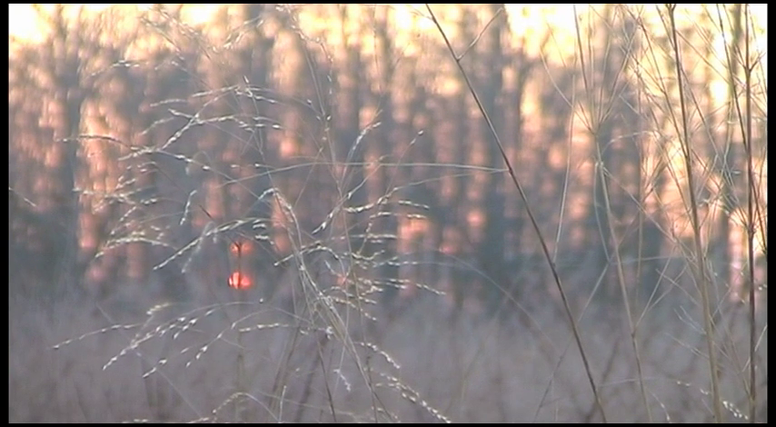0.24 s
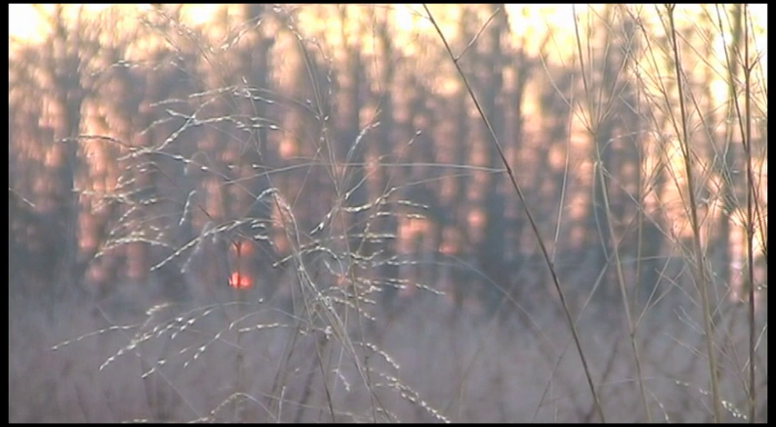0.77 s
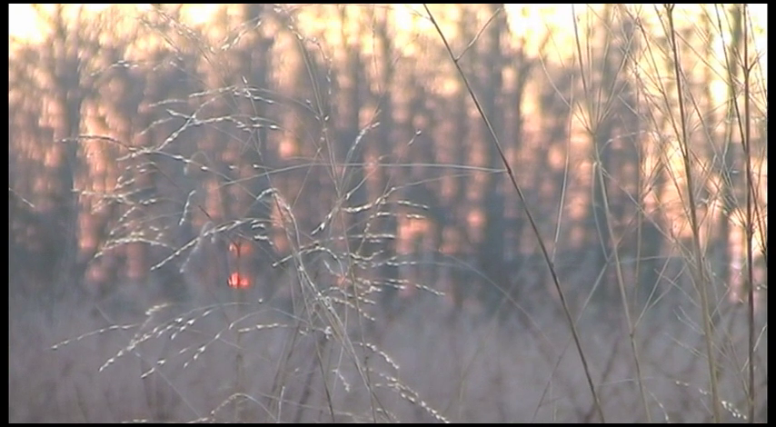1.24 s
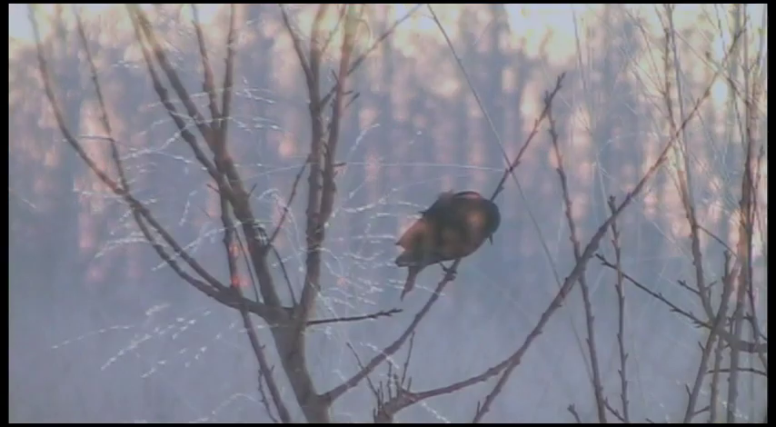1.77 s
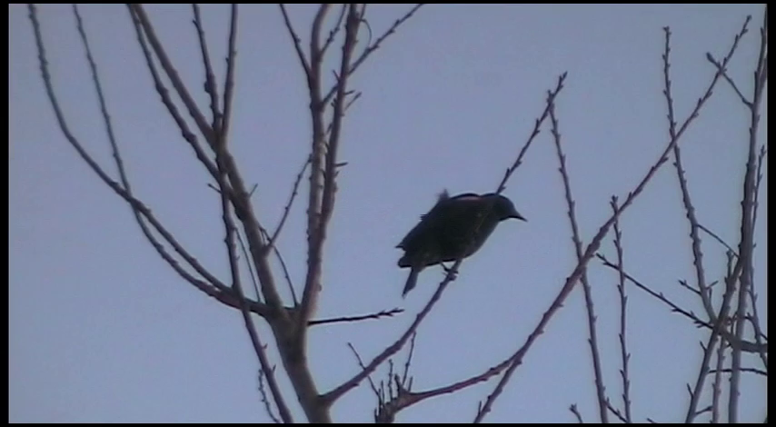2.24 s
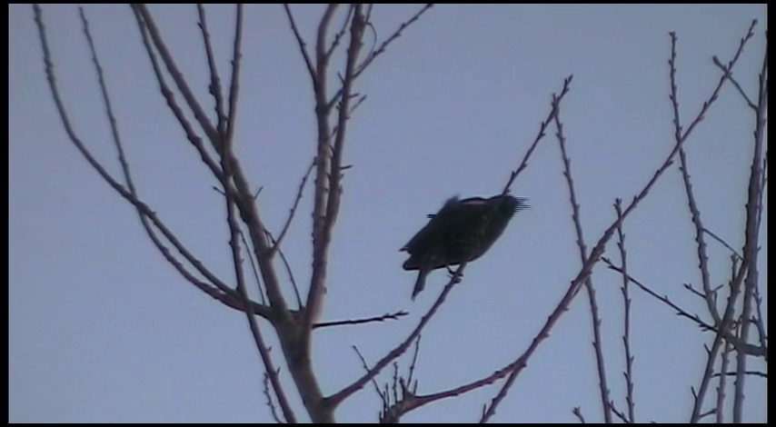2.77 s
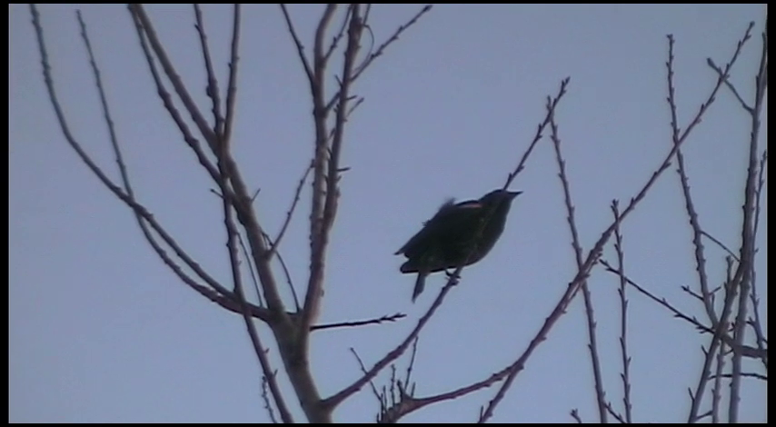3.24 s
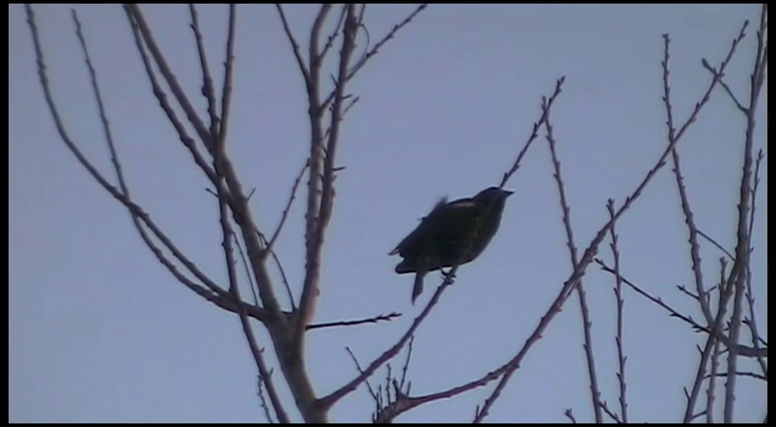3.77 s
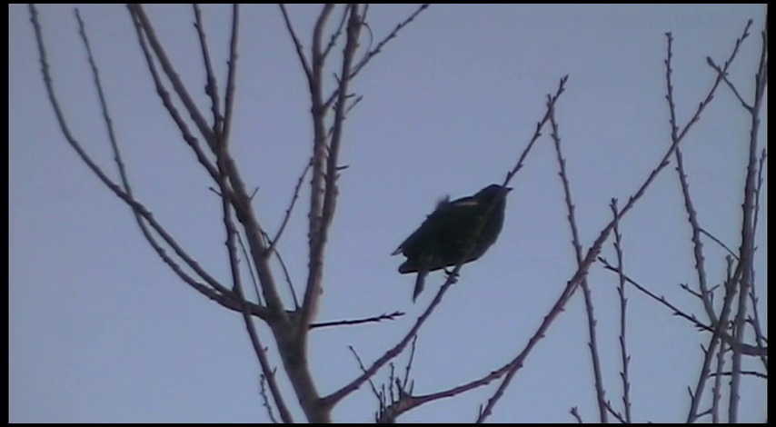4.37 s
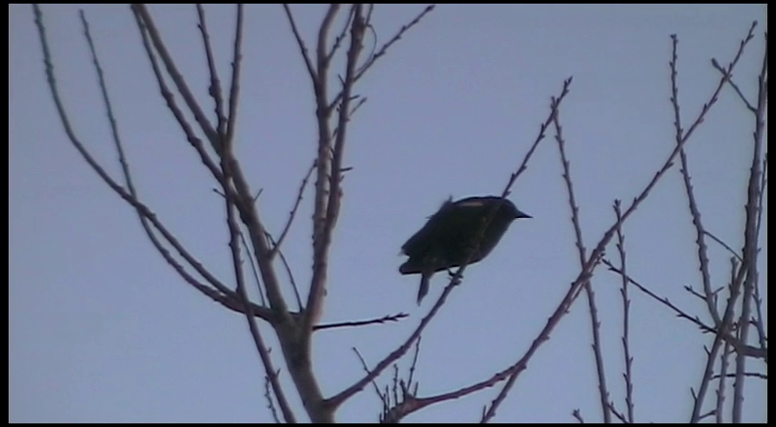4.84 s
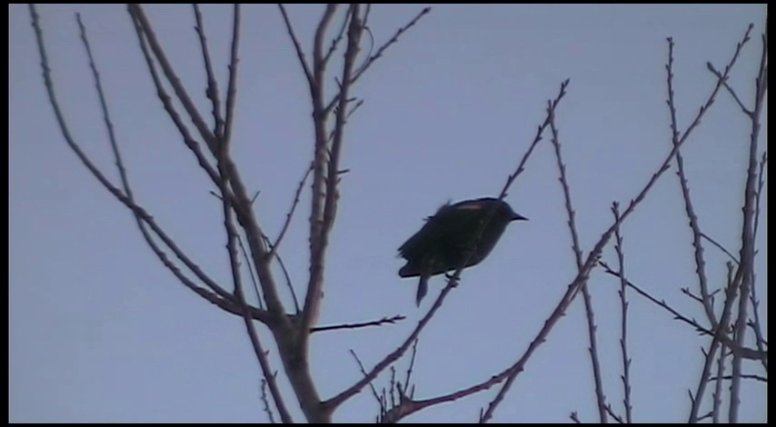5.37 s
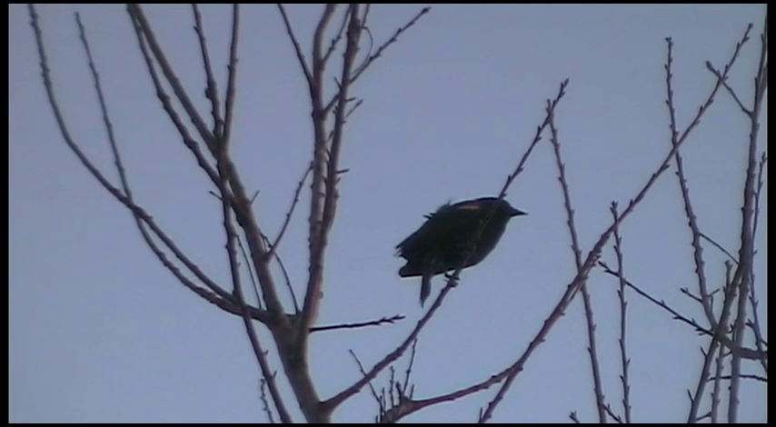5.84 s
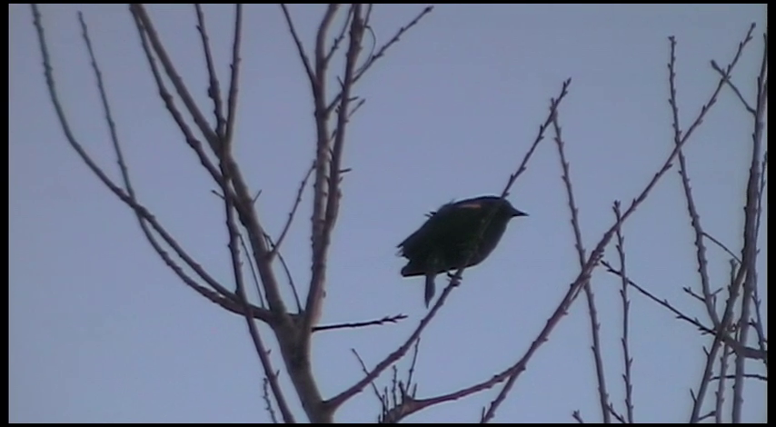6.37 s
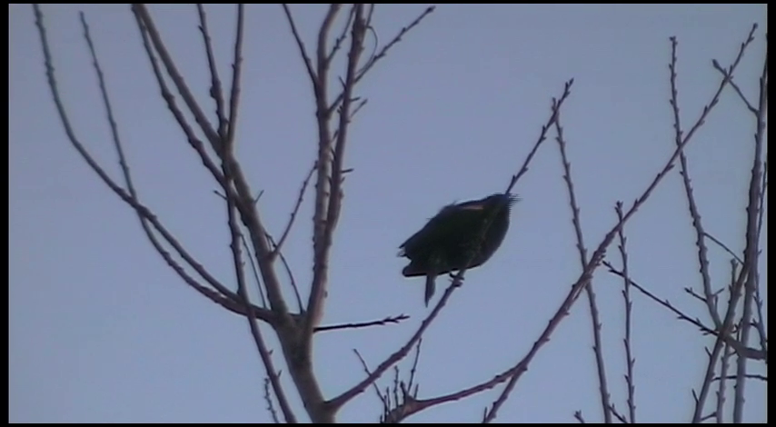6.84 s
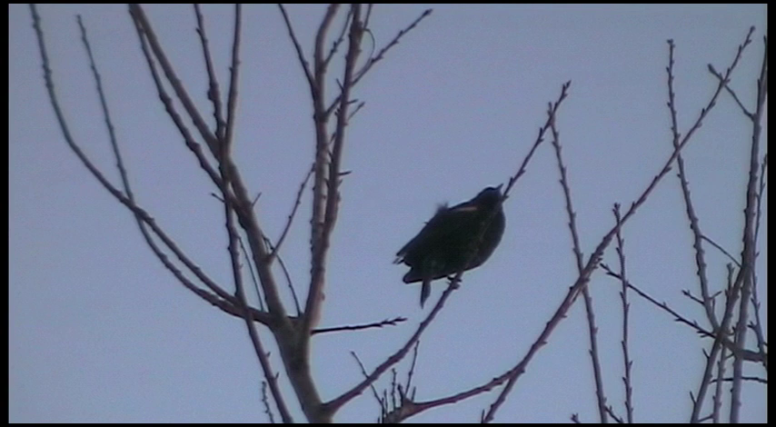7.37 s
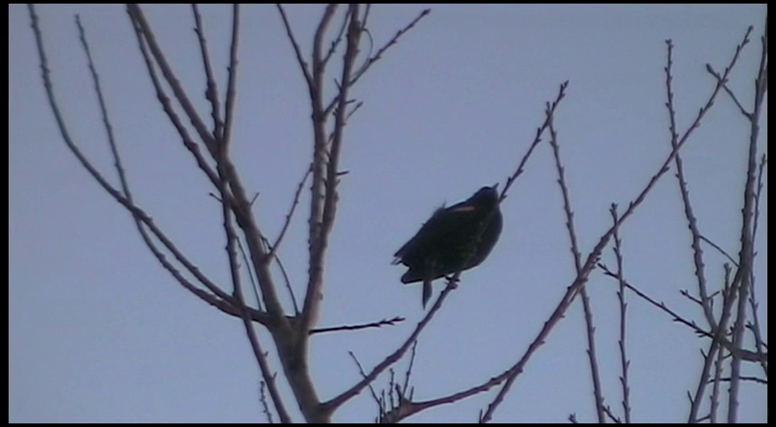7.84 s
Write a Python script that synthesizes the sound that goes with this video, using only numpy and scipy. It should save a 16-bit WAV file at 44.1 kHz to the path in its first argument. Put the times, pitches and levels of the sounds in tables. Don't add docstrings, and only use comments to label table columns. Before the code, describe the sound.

Outdoor marsh at dawn. A distant flock squawks, buzzes and chatters throughout, blurred by reeds and trees, with occasional faint honks. A near bird twitters, whistles in a high arch with a low hook, swoops down and up, holds a long level whistle, then swoops again near six seconds. Birds and soft wind sit on the left of a hissy camcorder microphone; the right carries only hiss and faint motor hum.

```python
import sys
import numpy as np
from scipy import signal
from scipy.fft import rfft, irfft, next_fast_len
from scipy.io import wavfile
from scipy.ndimage import uniform_filter1d

SR = 44100
rng = np.random.default_rng(int(sys.argv[2]) if len(sys.argv) > 2 else 0)


def waveform_to_disk(signal):
    frames = np.transpose(np.atleast_2d(signal))
    scaled = np.clip(frames, -1, 1) * 32767
    samples = np.round(scaled).astype(np.int16)
    wavfile.write(sys.argv[1], SR, samples)


def magnitude_from_level(level_db):
    exponent = np.asarray(level_db, float) / 20
    return 10 ** exponent


N = 358091
T = np.arange(N) / SR

# f/Hz, density/dB per Hz
AIR_SPECTRUM = [(15, -89), (45, -77.5), (80, -80), (140, -85.5), (250, -91), (500, -95.5), (1000, -101),
                (1260, -97), (1500, -101), (2000, -102), (8000, -104), (10500, -112), (16000, -125)]
# f/Hz, density/dB per Hz
HISS_SPECTRUM = [(15, -91), (45, -99), (80, -94.5), (250, -100), (500, -102), (1500, -103.5), (6000, -103),
                 (16000, -103.5)]
# f/Hz, left level/dB, right level/dB
DRUM_TONES = [(29.97, -60, -61), (59.94, -65, -67), (119.9, -77, -77), (149.9, -79, -79), (299.7, -88, -88),
              (5185, -88, -88), (6114, -84, -84), (6173.8, -75, -75), (7102, -89, -89), (11357, -86, -86),
              (12345, -89, -89), (15732, -83, -83)]
# t/s, hiss level/dB, hum and wind level/dB
INPUT_GAIN = [
    (0, -2.5, -4),
    (1.2, -3, -4),
    (1.4, 0.5, 1.5),
    (2.2, -0.5, 1),
    (8.12, -0.5, 0.5),
]

REGISTERS_HZ = (1450, 2400, 2850, 3350, 3950, 4650, 5450, 6400, 9800)
MURMUR_LEVELS = (-69.5, -82, -76, -64, -63.5, -64.5, -62.5)
# f/Hz, level/dB
THROAT_TONE = [(1400, -2.5), (3200, -1.5), (5000, -2.5), (5650, -5), (6400, 5.5), (7300, -1.5), (10000, 7)]
# peak t/s, swell and fade/s, centre f/Hz, level/dB
DEEP_BURSTS = [(0, 0.17, 3380, -51), (.3, 0.27, 3420, -59), (.659, 0.14, 3300, -57),
               (.87, 0.19, 3400, -59.5), (.958, 0.14, 3330, -56.5), (1.146, 0.049, 3440, -56),
               (1.37, 0.047, 2820, -56), (1.6, 0.88, 3300, -56), (2.0, 0.15, 3650, -62),
               (2.35, 0.49, 3000, -57.5), (2.78, 0.17, 3320, -49.5), (3.11, 0.26, 3400, -53),
               (3.408, 0.14, 3020, -55), (3.564, 0.059, 2920, -53), (3.86, 0.53, 3240, -52),
               (4.06, 0.06, 3300, -48.5), (4.27, 0.098, 3050, -50.5), (4.45, 0.22, 3110, -51.5),
               (4.71, 0.15, 3080, -52), (5.02, 0.38, 2960, -55.5), (5.381, 0.14, 2940, -55.5),
               (5.635, 0.15, 3100, -53), (5.84, 0.071, 3400, -50.5), (6.005, 0.24, 3130, -49.5),
               (6.188, 0.081, 3420, -49.5), (6.5, 0.54, 3040, -52.5), (6.763, 0.091, 3550, -52.5),
               (7.25, 0.3, 3100, -53.5), (7.77, 0.41, 3100, -51.5), (7.985, 0.064, 3300, -54)]
# peak t/s, swell and fade/s, centre f/Hz, level/dB
SHRILL_BURSTS = [(0, 0.014, 3870, -41), (.36, 0.034, 6000, -60), (.47, 0.5, 5400, -77),
                 (.625, .05, 6600, -57), (1.23, 0.022, 6400, -55), (.74, 0.1, 4580, -54.5),
                 (.859, 0.047, 6700, -54), (.958, 0.048, 5300, -58), (1.274, 0.14, 4840, -55.5),
                 (1.402, 0.058, 4500, -54), (1.701, 0.093, 5800, -49), (1.85, 0.17, 4660, -55),
                 (2.194, .05, 4500, -71), (2.83, 0.12, 5430, -53), (3.408, 0.11, 5200, -54.5),
                 (3.8, 0.16, 5270, -51.5), (4.0, 0.18, 5300, -52.5), (4.34, 0.12, 5360, -51.5),
                 (4.49, 0.13, 5070, -51.5), (4.809, 0.027, 4930, -52.5), (5.05, 0.39, 4700, -56.5),
                 (5.35, 0.15, 4950, -60), (5.648, 0.023, 5070, -54), (6.02, 0.24, 6140, -56.5),
                 (6.33, 0.25, 5070, -53), (6.504, 0.19, 4730, -55), (6.763, 0.053, 5640, -51.5),
                 (6.95, 0.24, 4600, -60), (7.306, 0.21, 4500, -55), (7.686, 0.17, 5660, -55),
                 (7.886, 0.08, 5750, -54), (8.12, 0.12, 4700, -54)]

# t/s, length/s, f/Hz, level/dB
RASP_NOTES = [(0, .11, 3600, -54), (.925, .12, 3700, -53), (3.69, .05, 3300, -54), (3.85, .14, 3950, -54),
              (4.0, .1, 3150, -53), (4.205, .09, 3300, -52), (4.45, .11, 2800, -55), (4.47, .09, 4300, -57),
              (4.64, .15, 3300, -52), (4.93, .1, 3800, -56), (5.79, .085, 3600, -48), (5.9, .14, 3200, -53),
              (6.68, .12, 3100, -54), (7.27, .06, 4100, -56), (7.64, .2, 3150, -52), (7.86, .18, 3150, -53),
              (7.66, .05, 6200, -57), (7.84, .07, 6300, -57)]
# t/s, length/s, f/Hz, level/dB
HONK_NOTES = [(.009, .12, 2130, -57), (.009, .09, 2430, -51), (.748, .075, 1585, -66),
              (.955, .052, 1852, -65.4), (1.857, .098, 2500, -59.8), (2.03, .18, 2130, -59),
              (2.744, .086, 2550, -60.7), (3.392, .09, 1640, -65.8), (3.55, .1, 1640, -63),
              (3.896, .027, 2112, -58), (4.42, .057, 1585, -63), (5.62, .05, 1245, -65),
              (6.32, .124, 1650, -64.5), (6.741, .175, 2470, -56), (7.145, .034, 2450, -55.8),
              (7.35, .055, 1240, -67), (7.36, .07, 2000, -62), (6.38, .07, 2700, -58),
              (7.846, .062, 2010, -56)]
# t/s, f/Hz, level/dB
PEEP_NOTES = [(.154, 4934, -58), (.34, 6408, -58), (1.821, 5020, -52.6), (2.175, 4380, -54),
              (2.725, 6413, -59), (3.345, 6200, -53.7), (3.372, 6290, -53.5), (3.41, 4730, -52.5),
              (3.76, 4808, -60), (4.404, 6355, -57), (4.449, 4420, -54), (4.454, 4745, -54.5),
              (5.415, 4626, -57), (5.644, 6300, -59), (5.971, 6280, -55), (5.98, 6560, -50.5),
              (6.147, 6170, -54.7), (6.646, 6417, -56), (6.748, 6403, -53.7), (6.748, 4735, -53),
              (6.975, 3780, -55), (7.331, 4780, -52), (7.664, 6149, -57.3), (8.07, 4840, -60)]
# t/s, length/s, start f/Hz, end f/Hz, level/dB
SLIDE_NOTES = [(.243, 0.025, 4930, 4870, -51), (.729, 0.024, 5000, 4800, -46.5), (.8, .08, 3150, 3100, -59),
               (.49, .05, 4500, 4550, -58), (.57, .09, 6600, 6500, -63), (.31, .03, 6200, 5450, -63),
               (.35, .05, 3900, 3800, -61), (1.92, 0.25, 5340, 5580, -61.5), (2.04, 0.18, 4250, 3800, -58),
               (2.293, 0.06, 4100, 3780, -58), (3.763, 0.046, 6150, 6550, -51),
               (4.075, 0.011, 4000, 4300, -47), (5.625, 0.042, 4900, 4600, -61),
               (5.655, 0.057, 5550, 5630, -57), (5.975, 0.067, 2960, 2950, -56),
               (5.97, .055, 3560, 3560, -52), (5.975, 0.055, 3850, 3850, -53),
               (5.98, 0.054, 4900, 4500, -60), (6.745, 0.051, 5550, 5700, -56),
               (1.35, 0.11, 6200, 6200, -61), (1.2, .045, 6450, 6500, -59), (4.79, .12, 3830, 3720, -59.5),
               (4.95, 0.061, 3650, 3800, -56), (1.43, 0.066, 3900, 3880, -59),
               (6.395, .02, 3400, 3500, -50),
               (5.297, 0.019, 6500, 6300, -56), (5.28, .045, 3600, 3800, -58), (5.2, .1, 3500, 3500, -60),
                 (4.5, .025, 4400, 4500, -56), (4.5, .03, 3300, 3800, -56), (5.065, .03, 4900, 4950, -62),
                 (4.66, 0.068, 3400, 3200, -57), (4.22, 0.055, 3300, 3350, -56),
                 (4.37, .025, 3900, 3950, -55), (4.8, .03, 3600, 4000, -58), (7.69, 0.062, 3200, 3400, -56),
                 (7.1, 0.063, 3400, 3150, -59), (7.96, 0.074, 3150, 3100, -55),
                 (7.62, 0.061, 3700, 3850, -57), (7.62, .09, 2200, 2000, -63),
                 (6.79, .085, 2200, 2800, -61), (6.82, .11, 4650, 4650, -60.5),
                 (6.53, .07, 3200, 2950, -55), (6.7, .08, 3150, 3350, -55.5), (2.455, .04, 3100, 2800, -53),
                 (4.445, .04, 2800, 2700, -56), (4.54, .03, 2750, 2750, -56),
                 (4.27, 0.062, 2500, 2600, -57), (5.62, 0.036, 3100, 3400, -50),
                 (5.835, .03, 3200, 3600, -53), (5.88, 0.045, 3150, 3100, -55),
                 (.66, 0.02, 3700, 3550, -54), (7.985, 0.032, 3850, 3500, -59),
                 (8.025, .035, 6300, 6450, -59), (2.6, .035, 3200, 3500, -58),
                 (3.085, .03, 3350, 3600, -51), (7.785, 0.05, 2300, 2550, -57)]
# t/s, length/s, f/Hz, level/dB
CHACK_NOTES = [(.347, .032, 3180, -55.9), (.93, .048, 3995, -56.4), (.943, .052, 3665, -55.8),
               (.946, .027, 3325, -54.4), (1.2, .057, 3740, -56.2), (1.655, .063, 2903, -55.8),
               (2.335, .065, 3170, -51), (2.451, .039, 2975, -51.9), (2.562, .054, 3255, -55.9),
               (2.689, .073, 4030, -56.2), (2.88, .057, 3235, -51.2), (2.998, .032, 3150, -52.7),
               (3.558, .029, 2965, -54.1), (3.757, .052, 4010, -48), (3.898, .029, 3305, -48.6),
               (4.009, .045, 3180, -51.7), (4.059, .041, 3245, -49.3), (4.279, .107, 3410, -53.5),
               (4.714, .045, 3255, -54.2), (5.361, .023, 3365, -53.6), (5.603, .075, 3145, -54.4),
               (5.646, .029, 3980, -53), (5.925, .05, 3480, -56), (5.984, .045, 3265, -44.7),
               (6.088, .073, 3260, -50.1), (6.642, .034, 3850, -50.7), (6.746, .041, 3075, -51.9),
               (6.8, .08, 3647, -56), (7.803, .102, 3186, -55.8), (7.909, .057, 3170, -52)]

# t/s, length/s, start f/Hz, level/dB
TWITTER_NOTES = [(.228, .014, 5730, -54), (.228, .01, 4250, -57), (.405, .025, 6000, -63),
                 (.431, .018, 4800, -47), (.461, .016, 4400, -51), (.483, .006, 4400, -56),
                 (.503, .006, 4450, -53), (.515, .011, 4450, -53), (.535, .008, 4450, -53),
                 (.553, .006, 4600, -55), (.569, .005, 4330, -54), (.581, .005, 4330, -55)]
# t/s, length/s, start f/Hz, end f/Hz, level/dB
CHIP_NOTES = [(1.082, .006, 6600, 8600, -45), (1.088, .007, 8700, 4170, -46),
              (1.217, .006, 4600, 6500, -50), (.243, .04, 6800, 7350, -63), (.283, .013, 7350, 9000, -62),
              (1.307, .006, 4700, 6300, -49), (1.391, .006, 4600, 6300, -50),
              (1.613, .006, 7940, 10000, -40), (2.781, .014, 6260, 6080, -41),
              (2.797, .014, 6300, 5500, -46), (.932, .01, 4300, 3500, -51), (.948, .01, 3900, 3200, -50),
              (.964, .01, 4100, 3400, -51), (3.306, .0086, 6100, 9300, -51), (3.313, .008, 8750, 5060, -52),
              (3.324, .025, 6250, 6270, -43.5), (5.787, .02, 3250, 3400, -45),
              (5.804, .008, 3150, 3950, -43), (5.821, .007, 3300, 4000, -45),
              (6.006, .007, 7600, 10100, -42), (3.724, .01, 5800, 4300, -54),
              (4.288, .012, 6200, 4400, -55)]
# t/s, f/Hz, level/dB
ARCH_WHISTLE = [(0.766, 6000, -55), (0.782, 6200, -44), (0.8, 6520, -41), (0.814, 7700, -45),
                (0.828, 10080, -49), (0.862, 10150, -60), (0.902, 10260, -57), (0.955, 10130, -55),
                (.99, 9620, -51), (1.03, 8484, -46), (1.06, 7126, -43.3), (1.084, 6643, -42)]
# t/s, f/Hz, level/dB
HOOK_WHISTLE = [
    (1.101, 3776, -52.5),
    (1.149, 4440, -42),
    (1.185, 4420, -46),
    (1.215, 4390, -44),
    (1.225, 4385, -53),
    (1.245, 4400, -50),
    (1.258, 4400, -58),
    (1.3, 4390, -59),
    (1.34, 4400, -68),
]
# t/s, f/Hz, level/dB
LONG_WHISTLE = [(2.798, 6050, -50), (2.818, 5330, -61), (2.862, 5065, -50), (2.893, 5020, -41.5),
                (2.92, 4940, -43), (2.985, 5010, -40.5), (3.065, 4960, -40), (3.165, 4865, -41),
                (3.22, 4920, -40), (3.27, 4900, -41), (3.312, 4890, -45)]
# start t/s, leap t/s, creep f/Hz, fall level/dB, leap level/dB
SWOOP_PAIR = [
    (1.628, 2.1115, 760, -35.5, -34),
    (6.02, 6.483, 850, -34, -35.5),
]
# t after the start/s, f/Hz
FALL_PITCH = [
    (0, 7650),
    (.033, 6350),
    (.051, 5890),
    (.102, 5065),
    (.15, 4270),
    (.221, 3535),
    (.298, 3260),
    (.37, 3170),
    (.46, 3200),
]
# f/Hz, level/dB
BEAK_TONE = [(3165, -17.5), (3270, -13), (3530, -6), (4250, -5), (5080, 0), (5890, -12), (6350, -5.5),
             (7650, -5.5)]
OCTAVE_LEVELS = [
    -34,
    -24,
    -27.5,
    -25,
    -30,
]
# t/s, echo level/dB
REED_ECHO = [
    (0, -7),
    (.76, -4),
    (1.0, -2),
    (1.06, -4),
    (1.09, -9),
    (1.12, -9),
    (1.55, -9.5),
    (8.12, -9.5),
]
# t/s, length/s, level/dB
RISER_NOTES = [
    (2.33, .12, -57.5),
    (3.853, .115, -58),
    (5.66, .118, -56),
    (7.13, .13, -56),
]
RISER_SPAN = (2740, 2912)


def walk(rate, count=N):
    hold = int(SR / rate)
    steps = np.repeat(rng.standard_normal(count // hold + 1), hold)
    return 1.3 * uniform_filter1d(uniform_filter1d(steps, hold), hold)[:count]


def coloured(points):
    hz, db = np.transpose(points)
    size = next_fast_len(N, True)
    bins_hz = np.arange(1, size // 2 + 2) * SR / size
    gain = magnitude_from_level(np.interp(np.log(bins_hz), np.log(hz), db))
    return irfft(rfft(rng.standard_normal(size)) * gain, size)[:N] * np.sqrt(SR / 2)


def echoes(x, t60, gap_s, sparse):
    t = np.arange(SR) / SR
    uneven = magnitude_from_level(sparse * rng.exponential(size=SR))
    tail = rng.standard_normal(SR) * uneven * magnitude_from_level(-60 * t / t60) * (t > gap_s)
    return signal.fftconvolve(x, tail / np.sqrt(np.sum(tail ** 2)))[:N]


def add(out, start, hz, gain, overtones_db=()):
    i = int(start * SR)
    n = min(len(hz), N - i)
    phase = 2 * np.pi * np.cumsum(hz[:n]) / SR
    tone = np.sin(phase)
    for k, db in enumerate(overtones_db, start=2):
        tone = tone + magnitude_from_level(db) * np.sin(k * phase) * (k * hz[:n] < SR / 4)
    out[i:i + n] += np.sqrt(2) * gain[:n] * tone


def glides(rows, wobble, flutter_db, rate, lean=.5, bend=1):
    out, waver, flutter = np.zeros(N), walk(rate), walk(rate)
    for s, length, hz0, hz1, db in rows:
        i = rng.integers(N // 2)
        u = np.linspace(0, 1, int(length * SR))
        hz = (hz0 + (hz1 - hz0) * u ** bend) * (1 + wobble * waver[i:i + len(u)])
        swell = np.sqrt(np.abs(np.sin(np.pi * u ** lean)))
        add(out, s, hz, swell * magnitude_from_level(db + flutter_db * flutter[i:i + len(u)]))
    return out


def open_air():
    s, _, wind_db = np.transpose(INPUT_GAIN)
    return coloured(AIR_SPECTRUM) * magnitude_from_level(0.55 * np.interp(T, s, wind_db) + 0.11 * walk(1.1))


def input_hiss():
    s, hiss_db, _ = np.transpose(INPUT_GAIN)
    hiss = np.array([coloured(HISS_SPECTRUM), coloured(HISS_SPECTRUM)])
    return hiss * magnitude_from_level(np.interp(T, s, hiss_db))


def tape_drum():
    s, _, hum_db = np.transpose(INPUT_GAIN)
    waver = magnitude_from_level(4 * walk(4) - 1.5)
    hum = np.zeros((2, N))
    for hz, left_db, right_db in DRUM_TONES:
        tone = np.sin(2 * np.pi * (hz * T + rng.random()))
        hum += magnitude_from_level([[left_db], [right_db]]) * tone * (waver if hz > 1000 else 1)
    return hum * magnitude_from_level(np.interp(T, s, hum_db) + 0.5)


def flock(count=3600):
    s, length, octave, slide, loudness = rng.random((count, 5)).T
    hz = 1500 * 2 ** (2.6 * octave)
    rows = zip(s * N / SR, .004 + .022 * length ** 2, hz, hz * (.92 + .18 * slide), 3 * loudness)
    squawks = glides(rows, wobble=.02, flutter_db=4, rate=350)
    chop = np.sin(np.pi * np.cumsum(60 * (1 + 0.16 * walk(3))) / SR) ** 2
    trills = magnitude_from_level(0.5) * rng.standard_normal(N) * (1.35 + chop) * 0.76
    voices = squawks / squawks.std() + trills
    voices = voices + magnitude_from_level(-2.5) * echoes(voices, 0.48, 0.00456, 3.05)
    size = next_fast_len(N, True)
    pitch = np.log(np.arange(1, size // 2 + 2) * SR / size)
    throat_hz, throat_db = np.transpose(THROAT_TONE)
    spectrum = rfft(voices, size) * magnitude_from_level(np.interp(pitch, np.log(throat_hz), throat_db))
    out = 0
    for k, murmur_db in enumerate(MURMUR_LEVELS):
        low, centre, high = REGISTERS_HZ[k:k + 3]
        share = np.interp(pitch, np.log((low, centre, high)), (0, 1, 0))
        band = irfft(spectrum * np.sin(share * np.pi / 2), size)[:N]
        slow = np.sqrt(uniform_filter1d(band ** 2, size=3500))
        out = out + band / slow * clamour(centre, murmur_db) * magnitude_from_level(-0.54) * np.sqrt(np.log(high / low))
    return out


def clamour(hz, murmur_db):
    fade_db, spread_db = 16.5, 51.5
    edge = 2.47
    s, swell, centre_hz, db = np.transpose(DEEP_BURSTS + SHRILL_BURSTS)[:, :, None]
    step = T[::200]
    fade = fade_db * np.abs((step - s) / swell) ** edge
    burst_db = db - fade - spread_db * np.log2(hz / centre_hz) ** 2
    power = magnitude_from_level(murmur_db) ** 2 + np.sum(magnitude_from_level(burst_db) ** 2, axis=0)
    return np.interp(T, step, np.sqrt(power))


def callers():
    honk_rise, peep_s = 1.025, 0.044
    rasps = [(s, length, hz, hz, db) for s, length, hz, db in RASP_NOTES]
    honks = [(s, length, hz, hz * honk_rise, db) for s, length, hz, db in HONK_NOTES]
    chacks = [(s, length, hz, hz, db) for s, length, hz, db in CHACK_NOTES]
    peeps = [(s, peep_s, hz, hz, db) for s, hz, db in PEEP_NOTES]
    rough = glides(rasps, wobble=.045, flutter_db=5, rate=700, lean=.7)
    notes = honks + chacks + peeps + SLIDE_NOTES
    return riser() + rough + glides(notes, wobble=.005, flutter_db=2.5, rate=150, lean=.9)


def songbird():
    rise_hz_per_s, twelfth_db = 62000, -32
    twitter = [(s, length, hz, hz + rise_hz_per_s * length, db) for s, length, hz, db in TWITTER_NOTES]
    out = glides(twitter, wobble=.012, flutter_db=3, rate=500, lean=2.2, bend=1.8)
    out = out + glides(CHIP_NOTES, wobble=.012, flutter_db=3, rate=500, lean=.7)
    whistles = (ARCH_WHISTLE, HOOK_WHISTLE, swoop(*SWOOP_PAIR[0]), LONG_WHISTLE, swoop(*SWOOP_PAIR[1]))
    for whistle, octave_db in zip(whistles, OCTAVE_LEVELS):
        s, hz, db = np.transpose(whistle)
        t = np.arange(s[0], s[-1], 1 / SR)
        pitch = uniform_filter1d(np.interp(t, s, hz), size=450, mode="nearest")
        pitch = pitch * (1 + .002 * walk(40, len(t)) + .003 * walk(170, len(t)))
        edge = np.clip(np.minimum(t - s[0], s[-1] - t) / .002, 0, 1)
        ripple = walk(160, len(t))
        beads = np.abs(1 + .27 * (ripple - uniform_filter1d(ripple, size=1300)))
        level = edge * beads * magnitude_from_level(np.interp(t, s, db) + 0.07)
        add(out, s[0], pitch, level, overtones_db=(octave_db, twelfth_db))
    return out


def swoop(start, leap, creep_hz, fall_db, leap_db):
    rest_hz = 2900
    leap_hz, leap_s, hold_s, creep_s = 1350, .0065, .147, .034
    sag_hz, sag_s, sag_db = 270, .085, -14
    end = leap + hold_s
    s = np.arange(start, end, 1 / 200)
    up = 1 / (1 + np.exp((leap - s) / leap_s))
    droop = np.clip(1 - (end - s) / sag_s, 0, 1) ** 2
    after, fall_hz = np.transpose(FALL_PITCH)
    fall = rest_hz + np.exp(np.interp(s - start, after, np.log(fall_hz - rest_hz)))
    creep = creep_hz * (1 - np.exp(np.minimum(leap - s, 0) / creep_s))
    hz = fall + leap_hz * up + creep
    beak_hz = np.minimum(hz, np.where(up > .5, BEAK_TONE[4][0], SR))
    db = fall_db + (leap_db - fall_db) * up + np.interp(beak_hz, *np.transpose(BEAK_TONE))
    return np.transpose([s, hz - sag_hz * droop, db + sag_db * droop ** 2])


def riser():
    out = np.zeros(N)
    low_hz, high_hz = RISER_SPAN
    for s, length, db in RISER_NOTES:
        u = np.linspace(0, 1, int(length * SR))
        hz = low_hz + (high_hz - low_hz) * np.sin(u * np.pi / 2)
        hz = hz * (1 + .003 * walk(60, len(u)))
        held = np.sqrt(np.clip(np.minimum(u, 1 - u) * 8, 0, 1))
        add(out, s, hz, held * magnitude_from_level(db + 3 * u + 1.5 * walk(80, len(u))))
    return out


def scene():
    far = callers()
    far = far + magnitude_from_level(-10.0) * echoes(far, 0.36, 0.0042, 1.0)
    near = songbird()
    reed_level = magnitude_from_level(np.interp(T, *np.transpose(REED_ECHO)))
    near = near + echoes(near * reed_level, .36, .004, 1.5)
    return np.array([near + far + flock() + open_air(), np.zeros(N)])


def masked(x):
    from_hz, to_hz = 260, 1300
    mask_db, cut_db = -25, -13
    hz, _, z = signal.stft(x, SR, nperseg=1024, noverlap=512)
    near, far = int(from_hz / hz[1]), int(to_hz / hz[1])
    power = np.abs(z) ** 2
    shadow = np.max([np.roll(power, k, axis=0) * magnitude_from_level(-(k - near)) for k in range(near, far)], axis=0)
    quiet = uniform_filter1d(power, size=5, axis=0) < shadow * magnitude_from_level(2 * mask_db)
    quiet = quiet & (hz[:, None] > 3000)
    return signal.istft(z * np.where(quiet, magnitude_from_level(cut_db), 1), SR, nperseg=1024, noverlap=512)[1][:N]


def roll_off(x):
    return signal.sosfilt(signal.butter(12, 15780, fs=SR, output="sos"), x)


def record(dry):
    mix = dry + input_hiss() + tape_drum()
    mix = np.array([masked(mix[0]), mix[1]])
    return roll_off(mix)


dry = scene()
out = record(dry)
waveform_to_disk(out)
```